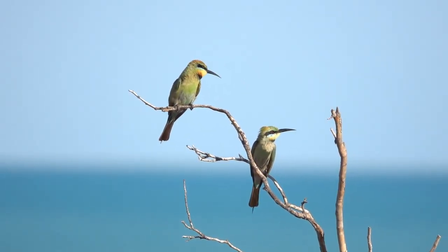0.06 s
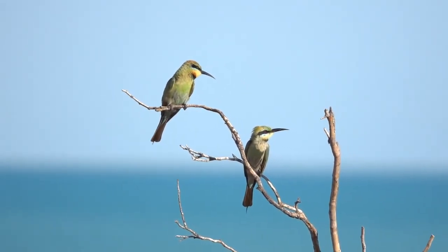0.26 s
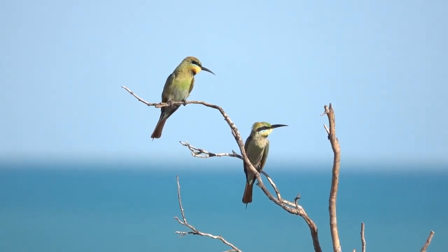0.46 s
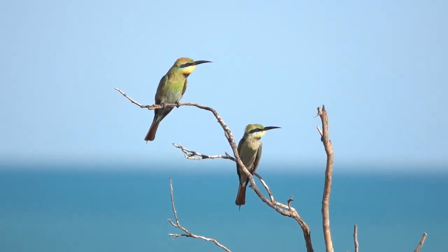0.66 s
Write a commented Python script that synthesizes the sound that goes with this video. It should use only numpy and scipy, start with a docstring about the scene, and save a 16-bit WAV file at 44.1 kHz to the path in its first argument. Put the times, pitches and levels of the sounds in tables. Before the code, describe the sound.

Wind buffets the microphone on an open shore, rumbling, fluttering and popping, strongest from about 1.2 to 2.1 seconds. Distant surf washes steadily, mostly on the right. In the first second come brief dry rustles and faint bird chirps; afterwards insects hiss very faintly far off. From about 2.2 to 2.6 seconds, camera handling makes a few sharp, close plastic clicks and one soft knock.

```python
"""Wind gusts buffet the microphone on an open shore, their eddies rumbling, fluttering and popping.
Distant surf washes steadily behind them, mostly on the right. At first something dry rustles close by;
small birds chirp faintly and insects hiss far off. Near the end the camera is handled:
its plastic parts click and ring right at the microphone, and the hand gives one soft knock."""
import sys
import numpy as np
from scipy import signal
from scipy.fft import rfft, irfft, next_fast_len
from scipy.io import wavfile
from scipy.ndimage import uniform_filter1d, map_coordinates

SR = 44100
rng = np.random.default_rng(int(sys.argv[2]) if len(sys.argv) > 2 else 0)


def persist_wave(psi):
    """Save psi, clipped to +-1, as 16-bit WAV."""
    counts = np.round(np.clip(psi, -1, 1) * 32767).astype(np.int16)
    wavfile.write(sys.argv[1], SR, np.atleast_2d(counts).T)


N = 116865

# gusts on the microphone, three bands before trim: time_s, rumble_db, body_db, flutter_db
GUST_LEVELS = [(0.0, -42, -49.5, -54), (0.09, -35, -38, -51.5), (0.18, -47, -54, -72),
               (0.23, -26.5, -27.5, -37.5), (0.34, -27.5, -26.5, -38), (0.35, -28.5, -33, -59.5),
               (0.63, -27.5, -40, -48.5), (0.69, -42, -44, -54), (0.86, -26.5, -36.5, -54),
               (1.05, -29, -27, -42), (1.11, -31.5, -43, -55), (1.14, -26.5, -21.5, -39),
               (1.17, -32.5, -29.5, -46), (1.224, -27.5, -27, -45.5), (1.236, -22, -18.5, -30),
               (1.275, -13.5, -17.5, -26), (1.287, -33, -28.5, -50), (1.35, -29.5, -22.5, -36.5),
               (1.41, -20.5, -19.5, -25.5), (1.56, -36.5, -19, -23.5), (1.59, -31.5, -30.5, -47),
               (1.68, -30, -43, -45.5), (1.77, -24, -22, -38), (1.84, -27, -28.5, -40.5),
               (1.98, -25.5, -25.5, -36.5), (2.07, -31.5, -27.5, -55), (2.14, -25, -39.5, -43),
               (2.18, -48, -27.5, -36), (2.27, -29.5, -30.5, -48.5), (2.65, -39.5, -51.5, -53)]
# colour of each wind band: freq_hz, density_db
RUMBLE_SPECTRUM = [(12, -18), (25, -10), (50, 2.5), (90, 3), (115, 2), (160, -22), (300, -81.5)]
BODY_SPECTRUM = [(50, -18), (90, -18.5), (120, 1), (170, 1.5), (240, -12.5), (320, -23), (600, -85.5)]
FLUTTER_SPECTRUM = [(130, -42.5), (200, -4), (260, 0.5), (350, -5), (500, -16), (700, -23.5), (1100, -41),
                    (2500, -84)]
# how much body and flutter differ between the two microphone ports: time_s, unlike_share
GUST_SWIRL = [(1.6, 0.17), (1.76, 1), (2.3, 0.15)]
# single eddies on the microphone: centre_s, level_db, pitch_hz
EDDY_POPS = [(0.241, -16.5, 105), (0.332, -13, 135), (0.604, -26.5, 263), (1.373, -10.5, 120),
             (1.538, -8, 217), (1.777, -11.5, 90), (1.943, -16, 180), (1.984, -9, 60.6),
             (2.112, -13.5, 155)]

# contacts on the casing, and a hollower snap as of a button: start_s, gain_db, tilt_db_per_octave
CASING_CLICKS = [(2.3756, -27.5, -3.5), (2.4071, -21, 6.5), (2.4092, -16.5, 2.5), (2.5867, -50, 16),
                 (2.6465, -14.5, 0.5)]
BUTTON_SNAPS = [(2.1674, -20, -1.2)]
# ringing modes of those parts: pitch_hz, gain_db, t60_s
CASING_MODES = [(1486, -3.5, 0.011), (2137, -2.5, 0.0078), (2610, -3, 0.0063), (3830, -6.5, 0.0047),
                (6150, -11, 0.0056), (7250, -12.5, 0.0049), (8700, -22.5, 0.01), (11200, -25, 0.0052)]
BUTTON_MODES = [(520, -8, .022), (930, -6, .03), (1280, -8, .018), (2030, 2, .014), (2600, -1, .011),
                (6080, -6, .008), (7200, -14, .007)]
# colour of a contact's crack and of the hand's knock: freq_hz, density_db
CRACK_SPECTRUM = [(1000, -8.5), (7000, 7), (15000, -10.5)]
KNOCK_SPECTRUM = [(150, -16), (430, 3), (950, -7.5), (1500, -11), (4000, -53.5)]

# distant surf and the fine hiss above it: time_s, level_db
SURF_LEVELS = [(0, -41), (.6, -42), (.75, -45), (.9, -43), (1.5, -46.5), (1.8, -45.5), (2.65, -44.5)]
HISS_LEVELS = [(0, -70.5), (.7, -69), (1.24, -71.5), (1.48, -78), (1.75, -71.5), (2.65, -71)]
# their colours: freq_hz, density_db
SURF_SPECTRUM = [(40, 4.5), (200, -1.5), (800, -0.5), (1050, 0), (1200, -2), (1600, 0), (1900, -6),
                 (2500, -10), (3200, -16), (4000, -18), (5500, -27.5), (8000, -27.5), (10000, -40.5),
                 (15000, -63.5)]
HISS_SPECTRUM = [(2000, -7.5), (6000, 4), (15500, 1)]
# how alike the surf is at the two ports: freq_hz, likeness
SURF_LIKENESS = [(200, 1), (800, 0.74), (1600, 0.9), (3200, 0.38), (9000, .2)]
# the surf's lean to the right: freq_hz, left_minus_right_db
SURF_BALANCE = [(200, -1.5), (700, -6.5), (1300, -5), (4400, -10.5), (8000, -19.5)]
# phase between the ports for surf and rustles: freq_hz, left_lead_rad
PORT_PHASE = [(100, 0.19), (600, 0.03), (1200, 1.24), (2400, 0.48), (4000, 0.87), (6500, 0.26)]

# dry scuffs and lighter swishes nearby: centre_s, level_db, half_length_s
SCUFF_SWELLS = [(0.05, -44.5, 0.018), (.165, -40, 0.008), (0.357, -36.5, 0.0045), (0.367, -28, 0.003),
                (0.446, -42, 0.004), (0.479, -38.5, 0.005), (0.562, -41, 0.013)]
SWISH_SWELLS = [(0.27, -60.5, 0.07), (0.57, -56.5, 0.022)]
# their colours: freq_hz, density_db
SCUFF_SPECTRUM = [(400, -19), (850, -19), (1120, 4), (1300, -1.5), (1650, 1.5), (2000, -19.5), (5000, -40),
                  (15000, -70)]
SWISH_SPECTRUM = [(2000, 1), (4200, -1.5), (9000, -13.5), (12000, -27)]

# birds on both sides: start_s, length_s, start_hz, middle_hz, end_hz, level_db, left_minus_right_db
BIRD_NOTES = [(0.262, 0.028, 5050, 5450, 5200, -65, -12), (0.57, 0.022, 4570, 4770, 4880, -64, -13),
              (0.564, 0.043, 1765, 2030, 1900, -54.5, 19), (0.756, 0.091, 6760, 7130, 6900, -60.5, -19),
              (0.76, 0.072, 7850, 8020, 8060, -67, -19), (0.816, 0.031, 3200, 3100, 3100, -58, 20),
              (0.845, .06, 3150, 3310, 2680, -57.5, 33.5)]
# far insect song: time_s, level_db, centre_hz
INSECT_SONG = [(.5, -88, 7700), (1.0, -74, 7770), (1.33, -74, 8270), (1.85, -80, 8280), (2.07, -72, 8330),
               (2.65, -80, 8650)]
# its stronger pulses: centre_s
INSECT_PULSE_TIMES = [1.275, 1.333, 2.02, 2.062]

WIND_LAG_S = 0.00056  # eddies reach the left port first


def wind():
    """Gusts right on the microphone: large eddies rumble, small ones flutter."""
    rumble_db, body_db, flutter_db = curves(GUST_LEVELS)
    swirl, = curves(GUST_SWIRL)
    body_trim_db = -2.5
    return (amp(rumble_db) * eddies(RUMBLE_SPECTRUM, unlike=0.17, even_s=0.14)
            + amp(body_db + body_trim_db) * eddies(BODY_SPECTRUM, unlike=swirl, even_s=0.11)
            + amp(flutter_db) * eddies(FLUTTER_SPECTRUM, unlike=swirl, even_s=0.026))


def eddies(spectrum, unlike, even_s):
    """Turbulence, its strength evened out over even_s, passing one port and then the other."""
    pair = noise(spectrum)
    power = np.abs(uniform_filter1d(pair ** 2, int(even_s * SR), axis=1))
    steady = spread(pair / np.sqrt(power + 1e-6), alike=1 - unlike)
    lead_s = WIND_LAG_S * np.array([[.5], [-.5]])
    return unit(filtered(steady, lambda hz: np.exp(2j * np.pi * hz * lead_s)))


def wind_pops(half_length_cycles=0.36):
    """A sharp eddy hits the microphone as one short push and pull of pressure."""
    t = np.arange(N) / SR + WIND_LAG_S * np.array([[.5], [-.5]])
    out = np.zeros((2, N))
    for centre_s, db, hz in EDDY_POPS:
        cycles = (t - centre_s) * hz
        out -= amp(db) * np.sin(2 * np.pi * cycles) * np.exp(-.5 * (cycles / half_length_cycles) ** 2)
    return out


def camera_clicks(contacts, modes, pan_db=-8.5, left_lag_s=.00002, crack_db=-20, crack_t60_s=0.013):
    """Each contact cracks and briefly rings a plastic part, just right of the microphone."""
    t, out = np.arange(SR // 20) / SR, np.zeros((2, N + SR))
    hz, mode_db, t60_s = np.transpose(modes)[:, :, None]
    octaves = np.log2(hz / 3000)  # the tilt pivots at 3 kHz
    ports = pan(pan_db - 1.5 * octaves)[:, :, None]  # higher modes sit further right
    arrival = t - left_lag_s * np.array([1, 0])[:, None, None]
    rise = 1 - np.exp(-t * hz / 0.85)  # a mode swells over about a cycle
    for start_s, db, tilt_db in contacts:
        phase = .6 * rng.standard_normal((2, len(hz), 1))
        decay = amp(mode_db + tilt_db * octaves - 60 * t / t60_s)
        ring = ports * rise * decay * np.sin(2 * np.pi * hz * arrival + phase)
        burst = spread(noise(CRACK_SPECTRUM)[:, :len(t)], alike=0.87) * pan(pan_db)
        crack = amp(crack_db + tilt_db - 60 * t / crack_t60_s) * burst
        out[:, round(start_s * SR):][:, :len(t)] += amp(db) * (ring.sum(1) + crack)
    return out[:, :N]


def hand_knock(start_s=2.3235, level_db=-27, rise_s=0.0008, t60_s=.035):
    """The hand bumps the camera: a dull, quickly damped knock."""
    t = np.maximum(np.arange(N) / SR - start_s, 0)
    envelope = amp(level_db - 60 * t / t60_s) * (1 - np.exp(-t / rise_s))
    return envelope * spread(noise(KNOCK_SPECTRUM), alike=0.43)


def surf(waver_db=0.27):
    """The wash of distant surf off to the right, with a fine hiss above it."""
    wash_db, = curves(SURF_LEVELS)
    hiss_db, = curves(HISS_LEVELS)
    wash_gain = amp(wash_db + waver_db * wobble(9.1))
    wash = from_right(noise(SURF_SPECTRUM), SURF_LIKENESS, SURF_BALANCE)
    hiss = spread(noise(HISS_SPECTRUM), alike=0.48)
    return wash_gain * wash + amp(hiss_db) * hiss


def rustles(grain_db=3, pan_db=-11):
    """Something dry brushes nearby on the right, in short grainy scuffs and lighter swishes."""
    grain = amp(grain_db * wobble(450))
    out = np.zeros((2, N))
    for strokes, spectrum in [(SCUFF_SWELLS, SCUFF_SPECTRUM), (SWISH_SWELLS, SWISH_SPECTRUM)]:
        friction = from_right(noise(spectrum), likeness=[(1500, 1.0)], balance=[(1500, pan_db)])
        out += swells(strokes) * unit(grain * friction)
    return out


def birds(warble_hz=85, warble_depth=.016, edge_s=0.0076, burr_db_per_khz=.45, echo_db=-8, echo_t60_s=0.22):
    """Small birds whistle gliding, warbling notes with a faint outdoor echo; higher ones are burrier."""
    t, out = np.arange(N) / SR, np.zeros((2, N))
    for start_s, length_s, start_hz, middle_hz, end_hz, db, pan_db in BIRD_NOTES:
        age_s = t - start_s
        progress = np.clip(age_s / length_s, 0, 1)
        glide_hz = np.polyval(np.polyfit([0, .5, 1], [start_hz, middle_hz, end_hz], 2), progress)
        warble = np.sin(2 * np.pi * warble_hz * t) + .5 * wobble(280)
        hz = glide_hz * (1 + warble_depth * warble)
        whistle = np.sqrt(2) * np.sin(2 * np.pi * np.cumsum(hz) / SR)
        gate = np.clip(np.minimum(age_s, length_s - age_s) / edge_s, 0, 1)
        burr = unit(amp(burr_db_per_khz * middle_hz / 1000 * wobble(220)))
        out += amp(db) * burr * gate * whistle * pan(pan_db)
    tail = rng.standard_normal((2, SR // 2)) * amp(-60 * t[:SR // 2] / echo_t60_s)
    echo = signal.fftconvolve(out, tail / np.linalg.norm(tail[0]), axes=1)[:, :N]
    return out + amp(echo_db) * echo


def insects(width_hz=190, flicker_db=3.5, pulse_db=-72.5, pulse_half_s=.007, pan_db=-24):
    """Insects far off to the right: a thin, flickering band of song with a few stronger pulses."""
    level_db, centre_hz = curves(INSECT_SONG)
    band = filtered(rng.standard_normal(N), lambda hz: np.exp(-.5 * (hz / width_hz) ** 2))
    song = unit(band * np.sin(2 * np.pi * np.cumsum(centre_hz) / SR))
    flicker = unit(amp(flicker_db * wobble(40.2)))
    pulses = swells([(centre_s, pulse_db, pulse_half_s) for centre_s in INSECT_PULSE_TIMES])
    return (amp(level_db) * flicker + pulses) * song * pan(pan_db)


def from_right(pair, likeness, balance):
    """A sound field on the right as the two microphone ports hear it."""
    hz = np.fft.rfftfreq(N, 1 / SR)
    lead = np.exp(.5j * along(PORT_PHASE, hz) * np.array([[1], [-1]]))
    spectra = spread(rfft(pair), along(likeness, hz))
    return unit(irfft(spectra * pan(along(balance, hz)) * lead, N))


def spread(pair, alike):
    """Two unrelated signals mixed into left and right of a given likeness."""
    angle = np.arccos(np.clip(alike, -1, 1)) / 2
    mid, side = np.cos(angle) * pair[0], np.sin(angle) * pair[1]
    return np.array([mid + side, mid - side])


def pan(db):
    """Left and right gains for a left-minus-right level."""
    gains = np.array([amp(db / 2), amp(-db / 2)]).reshape(2, -1)
    return gains / np.sqrt(np.mean(gains ** 2, axis=0))


def noise(spectrum):
    """Two unrelated noises of one colour."""
    return unit(filtered(rng.standard_normal((2, N)), lambda hz: amp(along(spectrum, hz))))


def filtered(x, response):
    """x through a complex frequency response."""
    size = next_fast_len(N + SR // 2)
    return irfft(rfft(x, size) * response(np.fft.rfftfreq(size, 1 / SR)), size)[..., :N]


def swells(rows):
    """Gain of bell-shaped swells, from rows of centre_s, level_db, half_length_s."""
    t = np.arange(N) / SR
    return np.sqrt(sum(amp(db) ** 2 * np.exp(-.5 * ((t - s) / half) ** 2) for s, db, half in rows))


def wobble(rate):
    """A smooth random curve, rate knots a second."""
    return map_coordinates(rng.standard_normal(int(N * rate / SR) + 4), [np.arange(N) * rate / SR])


def curves(rows):
    """One value per sample for each column after the time."""
    time_s, *columns = np.transpose(rows)
    return [np.interp(np.arange(N) / SR, time_s, column) for column in columns]


def along(points, hz):
    """Rows of freq_hz, value, read at hz on a log axis."""
    freq_hz, values = np.transpose(points)
    return np.interp(np.log(hz + 1), np.log(freq_hz + 1), values)


def amp(db):
    """Decibels to gain."""
    return 10 ** (np.asarray(db) / 20)


def unit(x):
    """Scaled to rms 1."""
    return x / np.sqrt(np.mean(x ** 2) + 1e-20)


def scene():
    """The shore from where the camera stands: wind and handling up close, the rest beyond."""
    clicks = camera_clicks(CASING_CLICKS, CASING_MODES) + camera_clicks(BUTTON_SNAPS, BUTTON_MODES)
    handling = clicks + hand_knock()
    return wind() + wind_pops() + handling + surf() + rustles() + insects() + birds()


def record(dry):
    """The camera keeps nothing above its band limit."""
    top_hz = 15730
    return filtered(dry, lambda hz: hz < top_hz)


dry = scene()
out = record(dry)
persist_wave(out)
```